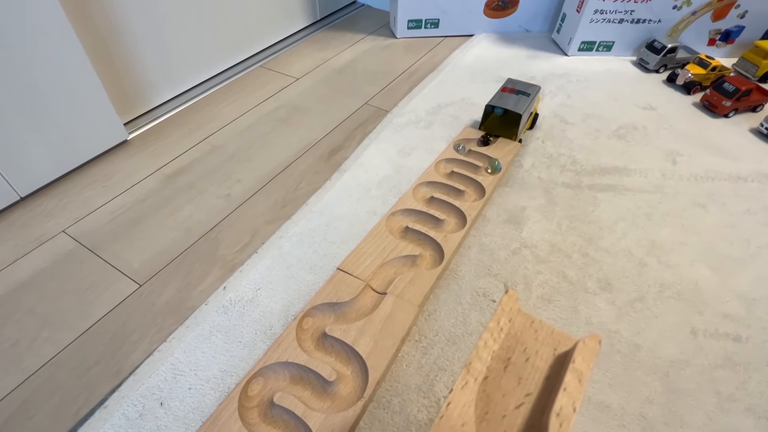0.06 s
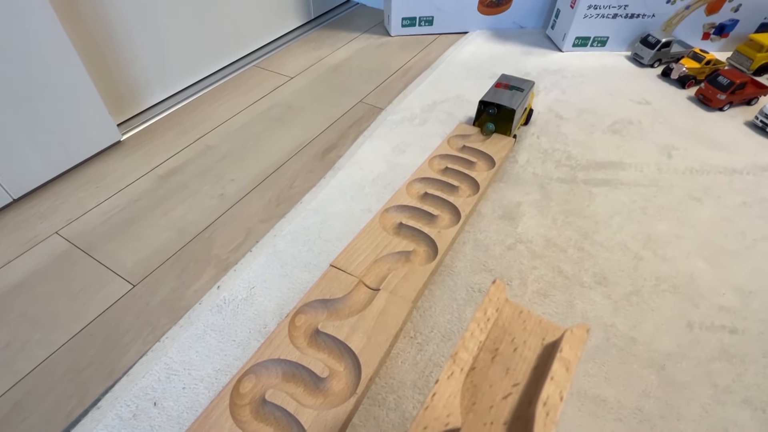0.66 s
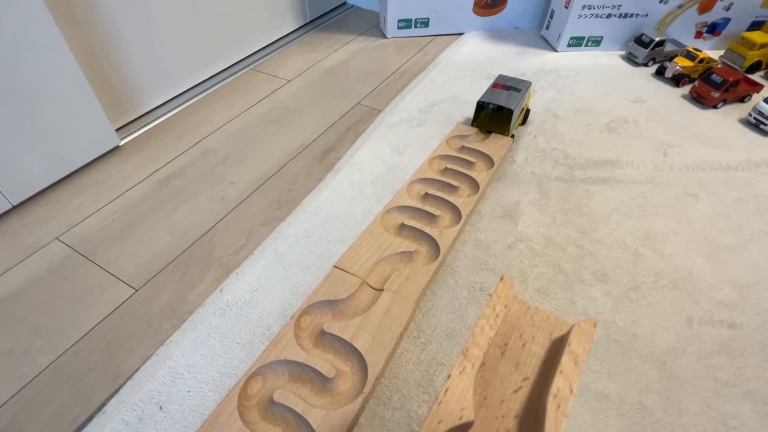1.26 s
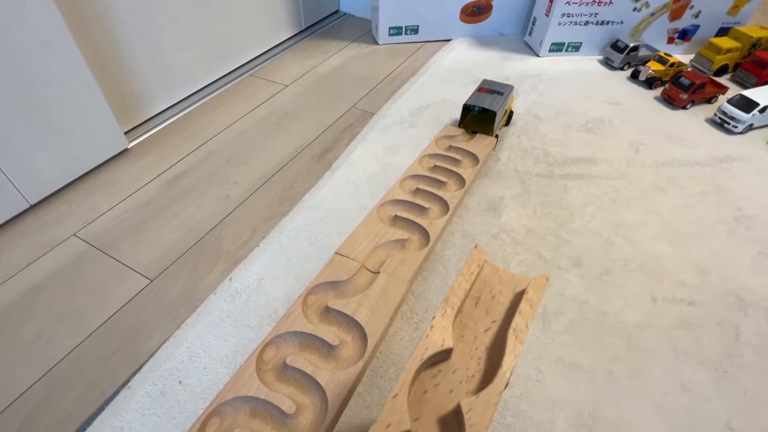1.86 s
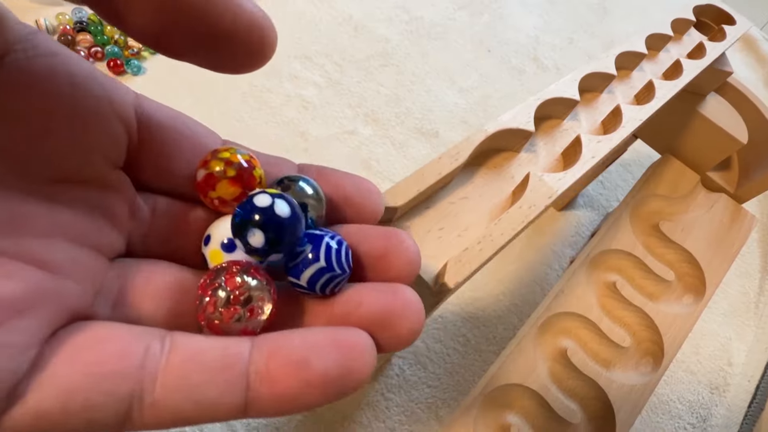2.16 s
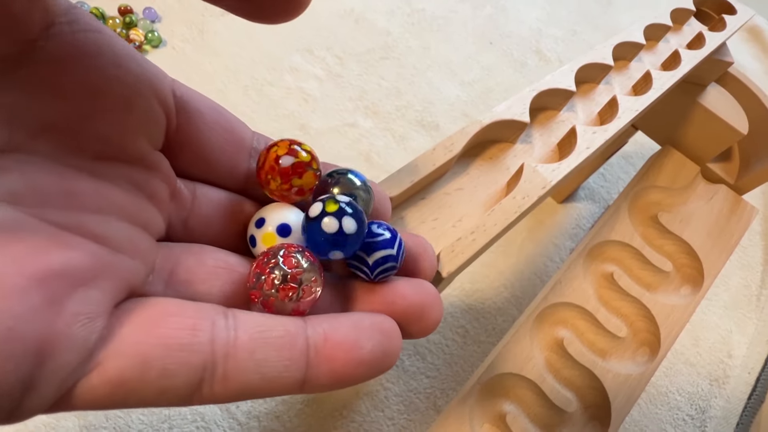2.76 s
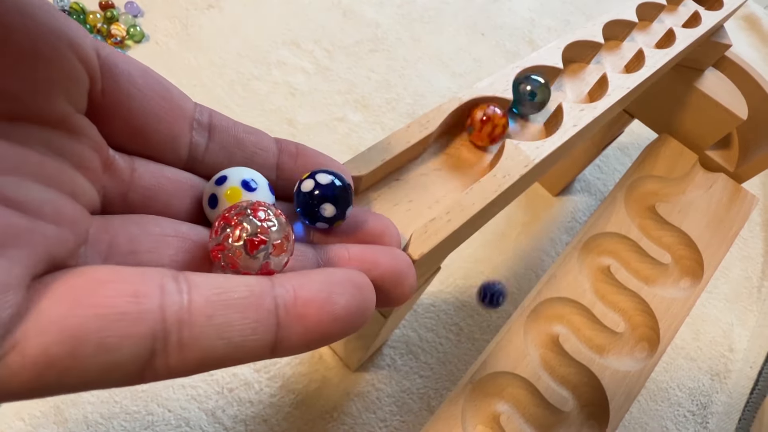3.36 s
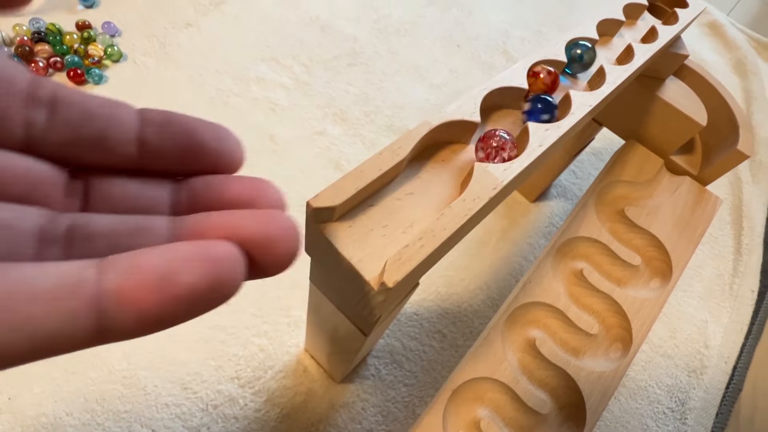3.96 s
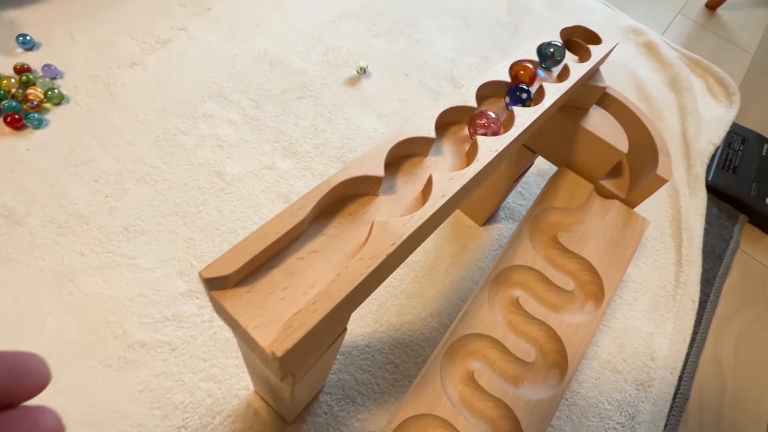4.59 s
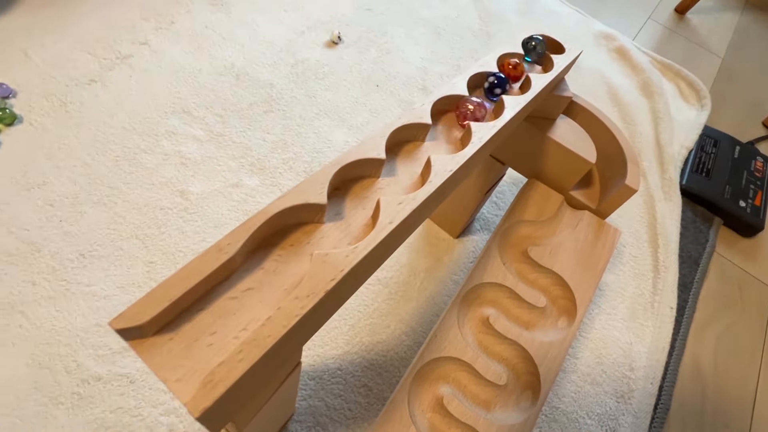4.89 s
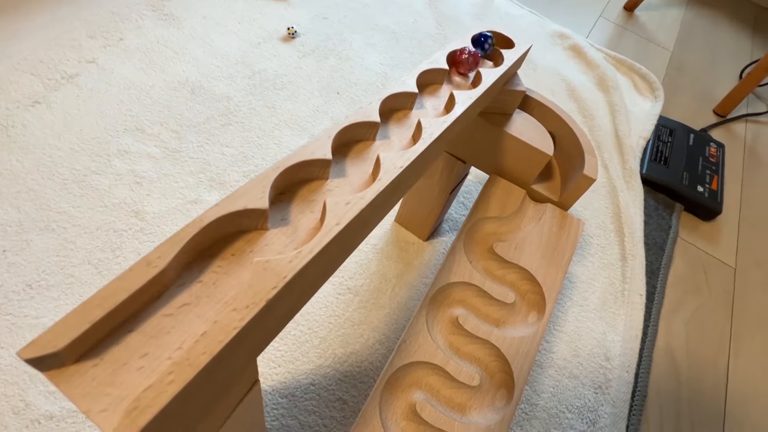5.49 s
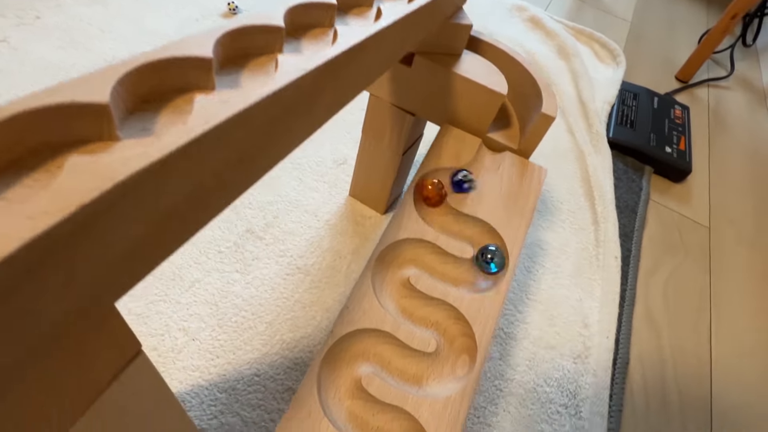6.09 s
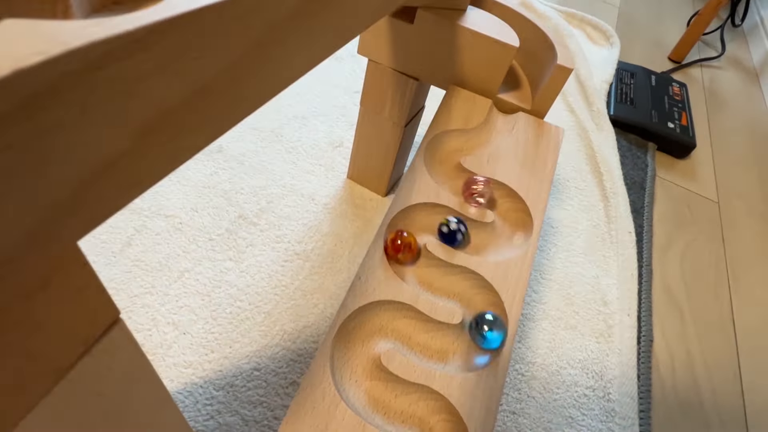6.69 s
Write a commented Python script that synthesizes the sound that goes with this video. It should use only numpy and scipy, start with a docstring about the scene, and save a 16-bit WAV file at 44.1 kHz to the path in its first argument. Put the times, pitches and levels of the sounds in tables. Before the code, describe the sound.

A marble rolls down grooved wood, then several more click, tumble onto a wooden run, and roll, bounce and clash in a quiet room.

```python
"""A living room, with glass marbles on a wooden marble run that stands on a rug.
One marble rattles down a far grooved board into a toy car. A handful clicks in a palm and is tipped into
a tray; two miss and thud on the rug, the rest knock along a scalloped ramp, drop through a bend and roll
down a winding groove. Impacts excite the damped modes of each piece, rolling drives them with a train of
tiny scuffs, and the room adds a diffuse field over quiet air, mains hum and floor rumble."""
import sys
import numpy as np
from scipy import signal
from scipy.fft import rfft, irfft, next_fast_len
from scipy.io import wavfile

SR = 44100
rng = np.random.default_rng(int(sys.argv[2]) if len(sys.argv) > 2 else 0)


def bounce(signal):
    """Save signal as a 16-bit WAV file at the path given by the first command-line argument."""
    frames = np.transpose(np.atleast_2d(signal))
    limited = np.clip(frames, -1, 1)
    pcm = np.round(limited * 32767).astype(np.int16)
    wavfile.write(sys.argv[1], SR, pcm)


N = 297234
KNOCK_SIZE = 4096
TIME = np.arange(N) / SR
KNOCK_TIME = TIME[:KNOCK_SIZE]
KNOCK_HZ = np.fft.rfftfreq(KNOCK_SIZE, 1 / SR) + 1
TILT_FROM_HZ, THICK_TILT_FROM_HZ = 520, 1450  # hardness tilts the spectrum above this; thin, thick pieces


def from_db(db):
    return 10 ** (np.asarray(db) / 20)

def unit_rms(x):
    return x / np.sqrt(np.mean(x ** 2) + 1e-20)

def unit_energy(x):
    return x / np.sqrt(np.mean(np.sum(x ** 2, axis=-1)) + 1e-20)

def decay(t, t60):
    return np.exp(-np.log(1000) * t / t60)

def at_hz(points, hz):
    frequencies, values = np.array(points).T
    return np.interp(np.log(hz), np.log(frequencies), values)

def band_noise(edges_hz, shape):
    band = signal.butter(2, edges_hz, "band", fs=SR, output="sos")
    return signal.sosfilt(band, rng.standard_normal(shape))

def add(track, s, sound):
    """Superposition: a short sound joins the track at time s."""
    start = max(round(s * SR), 0)
    track[:, start:start + sound.shape[-1]] += sound[..., :N - start]

def panned(x, db):
    """Level difference, left minus right, sets the direction."""
    return x * from_db(db * np.array([[.5], [-.5]]))

def coloured(x, points):
    """Zero-phase filtering by a curve of f/Hz, gain/dB."""
    size = next_fast_len(N + KNOCK_SIZE)
    gain = from_db(at_hz(points, np.fft.rfftfreq(size, 1 / SR) + 1))
    return irfft(rfft(x, size) * gain, size)[..., :N]


# grid of every broad body response: f/Hz
BODY_HZ = [450, 1000, 2500, 6000, 8300, 10500, 16000]

def modal_response(body, modes, hardness, top_db, tilt_from_hz, min_width_hz=55, bass_cut_hz=320):
    """Modal superposition: each point of contact feeds and loads the resonances differently."""
    power = from_db(at_hz(list(zip(BODY_HZ, body)), KNOCK_HZ)) ** 2
    skirt = 1 + (KNOCK_HZ / 9000) ** 12
    for hz, width, db in modes:
        detuning = 2 * (KNOCK_HZ - hz * rng.normal(1, .008)) / max(width, min_width_hz)
        power += from_db(rng.normal(db, 2.5)) ** 2 / (1 + detuning ** 2) / skirt
    power /= 1 + (bass_cut_hz / KNOCK_HZ) ** 5  # small blocks radiate little bass
    # a harder, shorter contact tips the spectrum towards the treble
    octaves = np.log2(np.clip(KNOCK_HZ, tilt_from_hz, 12000) / 3000)
    shelf_db = np.interp(KNOCK_HZ, [9000, 12500], [0, top_db])
    magnitude = np.sqrt(power) * from_db(hardness * octaves + shelf_db)
    cepstrum = irfft(np.log(magnitude))  # folded below for a causal, minimum-phase response
    return np.exp(2 * rfft(cepstrum[:KNOCK_SIZE // 2], KNOCK_SIZE) - cepstrum[0])

def knocks(rows, body, modes, scatter_t60, lag_ms, apart_db, top_dropout=.27, tilt_from_hz=TILT_FROM_HZ):
    """Impact excitation: each knock scatters through the piece, partly along paths common to all."""
    out = np.zeros((2, N))
    burst = (1 - np.exp(-KNOCK_TIME / .0003)) * decay(KNOCK_TIME, scatter_t60)
    lag_samples = np.array([[0], [round(lag_ms * SR / 1000)]])
    delay = np.exp(-2j * np.pi * KNOCK_HZ * lag_samples / SR)
    common_paths = from_db(-8) * rng.standard_normal((3, KNOCK_SIZE))
    loudest_db = max(row[1] for row in rows)
    for s, db, hardness, *spot_hz in rows:
        paths = common_paths + rng.standard_normal((3, KNOCK_SIZE))
        both_sides, *each_side = rfft(unit_energy(paths * burst))
        excitation = both_sides * delay + from_db(apart_db) * np.array(each_side)
        # the highest treble drops out on quiet and dull knocks, as in compressed audio
        top_db = top_dropout * (db - loudest_db + 3.4 * min(hardness - 2, 0)) + rng.uniform(-4, 4)
        spot_modes = [(hz, 99, 1) for hz in spot_hz]
        response = modal_response(body, modes + spot_modes, hardness, top_db, tilt_from_hz)
        knock = unit_energy(irfft(excitation * response))
        add(out, s, from_db(db) * np.sqrt(.012 * SR) * knock)  # level: the energy spread over 12 ms
    return out

def bounces(s, db, flight_s, restitution, loss_db, hardness=0, duller_db=0, count=2):
    """Restitution scales each flight as the contacts weaken; rows of t/s, level/dB, hardness."""
    rows = []
    for k in range(count):
        rows.append((s, db - loss_db * k, hardness - duller_db * k))
        s += flight_s * restitution ** k
    return rows

def roll_envelope(runs, rise_db_per_s=0, attack_s=.026, release_db_per_s=123):
    """Rolling level follows speed: a steady slope in dB, then exponential decay once checked."""
    level = 0
    for start, end, db in runs:
        swell_db = rise_db_per_s * (np.clip(TIME, start, end) - start)
        release_db = release_db_per_s * np.maximum(TIME - end, 0)
        onset = np.clip(1 + (TIME - start) / attack_s, 0, 1)
        level = np.maximum(level, from_db(db + swell_db - release_db) * onset)
    return level

def rolling(level, body, modes, hardness, bumps_per_s, bump_t60, tilt_from_hz=TILT_FROM_HZ):
    """Roughness excitation: each tiny bump in the grain drives the modes with a brief scuff."""
    bumps = (rng.random(N) < bumps_per_s / SR) * rng.uniform(.2, 1, N)
    pressure = signal.lfilter([1], [1, -decay(1 / SR, bump_t60)], bumps + 1e-18)
    scuffs = pressure * (rng.standard_normal(N) + rng.standard_normal((2, N)))
    ring = irfft(modal_response(body, modes, hardness, top_db=-11.5, tilt_from_hz=tilt_from_hz))
    return unit_rms(signal.oaconvolve(scuffs, ring[None], axes=1)[:, :N]) * level

def coherent_noise(spectrum, side_db):
    """Partial coherence: one noise common to both sides, a weaker one on each alone."""
    noise = rng.standard_normal(N) + from_db(side_db) * rng.standard_normal((2, N))
    return unit_rms(coloured(noise, spectrum))


# room air: f/Hz, relative density/dB
AIR_SPECTRUM = [(22, -27.5), (62, -3), (280, -9.5), (500, -25.5), (950, -34.5), (1350, -22), (2200, -28),
                (4200, -43.5), (8700, -38), (16000, -67.5)]
# partials of a mains appliance: f/Hz, level/dB
HUM_PARTIALS = [(68, -71.5), (271, -71.5), (339, -74.5)]

def air_and_hum():
    """Ambient noise: a line spectrum of hum on the continuous spectrum of the air."""
    hum = sum(from_db(db) * np.sqrt(2) * np.sin(2 * np.pi * (hz * TIME + rng.random()))
              for hz, db in HUM_PARTIALS)
    return from_db(-63.5) * coherent_noise(AIR_SPECTRUM, side_db=-13) + hum


# spells of rumble: start/s, end/s, level/dB
RUMBLE_RUNS = [(0, 1.78, -59.5), (3.1, 8, -59)]
# its spectrum: f/Hz, relative density/dB
RUMBLE_SPECTRUM = [(22, -31.5), (66, 2), (85, -4.5), (200, -17), (1500, -88.5)]

def floor_rumble():
    """Structure-borne sound: low noise in the floor while the runs are in use."""
    return coherent_noise(RUMBLE_SPECTRUM, side_db=-14) * roll_envelope(RUMBLE_RUNS)


# broad response of the board: gain/dB at BODY_HZ
BOARD_BODY = [-24, -5.5, -12, -15.5, -18.5, -24, -22]
# its modes: f/Hz, width/Hz, gain/dB
BOARD_MODES = [(647, 88, -2), (1005, 150, 0.5), (1215, 100, 0), (1583, 37, -4), (2110, 140, -1),
               (2740, 38, -8), (3994, 130, -11)]
# free rolling: start/s, end/s, initial level/dB, hollow note f/Hz
BOARD_RUNS = [(-0.02, 0.061, -45, 1194), (0.084, 0.384, -39.5, 1200), (0.607, 0.862, -41.5, 1100),
              (1.126, 1.234, -37.5, 990)]
# wall impacts: t/s, level/dB, hardness/(dB/octave), struck spot f/Hz
BOARD_KNOCKS = [(0.1921, -20, 1.5, 2610), (0.2814, -18, -0.5, 1030), (0.5493, -24, 1, 3880),
                (0.5964, -26.5, 0, 1140), (0.775, -17.5, 1, 1620), (0.8007, -22, 2, 2730),
                (1.1391, -27, 4, 1390), (1.1657, -34, -4.5, 485), (1.2403, -33.5, 2, 2110)]
# skids in the turns: start/s, end/s, level/dB
BOARD_SKIDS = [(0.674, 0.69, -32.5), (0.748, 0.775, -29.5), (0.957, 0.97, -37.5), (1.374, 1.39, -50)]

def far_board():
    """Forced vibration: one marble drives the board by impact, rolling and sliding friction."""
    out = knocks(BOARD_KNOCKS, BOARD_BODY, BOARD_MODES,
                 scatter_t60=.049, lag_ms=0, apart_db=3.5, top_dropout=.69)
    for *run, hollow_hz in BOARD_RUNS:
        modes = BOARD_MODES + [(hollow_hz, 130, 5)]
        out += rolling(roll_envelope([run], rise_db_per_s=9), BOARD_BODY, modes,
                       hardness=-2.05, bumps_per_s=270, bump_t60=.019)
    return out + rolling(roll_envelope(BOARD_SKIDS), BOARD_BODY, BOARD_MODES,
                         hardness=.17, bumps_per_s=520, bump_t60=.023)


# broad response of glass: gain/dB at BODY_HZ
GLASS_BODY = [-26, -11, -6, 8.5, 4.5, -12.5, -12]
# single contacts, the first a faint handling knock: t/s, level/dB, hardness/(dB/octave)
GLASS_KNOCKS = [(1.936, -54, -11), (3.1771, -35, 14), (3.2105, -33, 10), (3.6999, -26.5, 19.5),
                (3.7413, -28.5, 13), (3.8015, -24.5, -1), (4.1245, -36, 0.5)]

def glass_clicks():
    """Elastic collision: the brief contact of glass radiates a broadband click; a faint, dull handling knock
    comes first."""
    return knocks(GLASS_KNOCKS, GLASS_BODY, [], scatter_t60=.019, lag_ms=.1, apart_db=4, top_dropout=0)


# broad response of marbles cupped in a hand: gain/dB at BODY_HZ
PALM_BODY = [-28, -22.5, -12, -4.5, -1, -12, -9.5]
# touches as they shift: t/s, level/dB
PALM_CLICKS = [(2.058, -59), (2.089, -66.5), (2.305, -64.5), (2.496, -53), (2.712, -57.5), (2.794, -54),
               (2.8562, -53), (3.0403, -32)]

def palm_chatter():
    """Contact chatter: glass rebounds quickly on glass, brighter for a firmer touch."""
    rows, firmest_db = [], max(db for s, db in PALM_CLICKS)
    for s, db in PALM_CLICKS:
        hardness = -1 - .058 * (firmest_db - db)
        rows += bounces(s, db, flight_s=.0066, restitution=.9, loss_db=6, hardness=hardness, count=3)
    return knocks(rows, PALM_BODY, [], scatter_t60=.014, lag_ms=0, apart_db=.5, top_dropout=.22)


# broad response of the tray: gain/dB at BODY_HZ
TRAY_BODY = [-70, -40, -8, -16.5, -16, -56, -63]
# its modes: f/Hz, width/Hz, gain/dB
TRAY_MODES = [(1246, 148, -0.5), (1560, 200, -3.5), (2110, 200, -7), (2820, 210, 0), (4555, 170, -2),
              (3217, 80, 2.5), (5274, 145, -3)]
# landings: t/s, level/dB, hardness/(dB/octave)
TRAY_KNOCKS = [(3.1232, -19.5, -1), (3.188, -26.5, -5), (3.2003, -22.5, -1), (3.2348, -20, -1.5),
               (3.2813, -23.5, 3), (3.3395, -29.5, 3.5), (3.3561, -27.5, -4), (3.362, -23, 12),
               (3.4381, -30, 0), (3.498, -38, -3.5), (3.6629, -22.5, -2.5), (3.7198, -18.5, -1.5),
               (3.754, -19.5, -0.5), (3.8148, -18.5, 7.5), (3.8814, -21.5, 5)]
# free rolling: start/s, end/s, initial level/dB
TRAY_RUNS = [(3.15, 3.4, -44.5), (3.73, 3.8, -30)]

def tray_tumble():
    """Inelastic impact: marbles land in the tray, hop once more weakly, and roll."""
    rows = []
    for s, db, hardness in TRAY_KNOCKS:
        flight_s = .013 * rng.uniform(.93, 1)
        rows += bounces(s, db, flight_s, restitution=1, loss_db=11, hardness=hardness)
    hits = knocks(rows, TRAY_BODY, TRAY_MODES, scatter_t60=.017, lag_ms=.43, apart_db=2.5)
    return hits + rolling(roll_envelope(TRAY_RUNS, rise_db_per_s=12), TRAY_BODY, TRAY_MODES,
                          hardness=-3, bumps_per_s=180, bump_t60=.0048)


# stray marbles: t/s, peak before the rug's damping/dB, first flight/s, restitution
RUG_DROPS = [(3.5101, -17.5, .204, .8), (4.086, -19, .273, .634)]

def rug_thuds(start_hz=740, glide_s=.0027, swell_s=.0062, rug_cut_hz=560):
    """Dispersion: bending waves in the floor bring the highs first; the boards ring on under the rug."""
    out, t = np.zeros((2, N)), TIME[:SR // 2]
    hardest_db = max(row[1] for row in RUG_DROPS)
    ring_envelope = from_db(-20) * (1 - np.exp(-t / swell_s)) * decay(t, .52)
    for drop in RUG_DROPS:
        for s, db, _ in bounces(*drop, loss_db=9.5, count=3):
            pace = 2 ** ((db - hardest_db) / 25.5)  # a softer landing is lower and slower
            age = t * pace
            hz = start_hz * pace / (1 + age / glide_s)
            pulse = age / swell_s * np.exp(.5 - .5 * (age / swell_s) ** 2)
            knock = pulse * np.sin(2 * np.pi * np.cumsum(hz) / SR)
            boards = unit_rms(band_noise((62, 300), len(t))) * ring_envelope
            add(out, s, from_db(db) * (knock + boards))
    return signal.sosfilt(signal.butter(2, rug_cut_hz, fs=SR, output="sos"), out)


# broad response of the ramp: gain/dB at BODY_HZ
RAMP_BODY = [-18.5, -50.5, -26, -16.5, -19, -61, -71]
# its modes: f/Hz, width/Hz, gain/dB
RAMP_MODES = [(1720, 290, 0.5), (2700, 140, -3), (3190, 115, 3.5), (4610, 72, -4)]
# free rolling: start/s, end/s, initial level/dB
RAMP_RUNS = [(3.6, 5.53, -54)]
# swings into the scallops: t/s, level/dB, hardness/(dB/octave), follower's delay/s
RAMP_SWINGS = [(4.0426, -26.5, 3.5, 0.016), (4.1853, -29, 4.5, 0.026), (4.3432, -28, 4, 0.016),
               (4.502, -30, 6, 0.02), (4.6452, -31, 2.5, 0.043), (4.8625, -30.5, 5.5, 0.014),
               (4.9689, -31.5, 5, .0365), (5.057, -32.5, 6.5, 0.013), (5.3236, -30.5, 6.5, 0.045)]
# lone taps: t/s, level/dB
RAMP_TAPS = [(3.9588, -22.5), (4.3783, -33), (4.4061, -35), (4.7047, -39.5), (4.818, -37)]

def scalloped_ramp(tap_hardness=7.5):
    """Paired impacts over rolling noise: a leader strikes each scallop, then a softer follower."""
    rows = []
    for s, db, hardness, delay_s in RAMP_SWINGS:
        rows += [(s, db, hardness), (s + delay_s, db - 1, hardness - 1)]
    rows += [(s, db, tap_hardness) for s, db in RAMP_TAPS]
    hits = knocks(rows, RAMP_BODY, RAMP_MODES, scatter_t60=.019, lag_ms=.1, apart_db=1)
    return hits + rolling(roll_envelope(RAMP_RUNS, rise_db_per_s=5), RAMP_BODY, RAMP_MODES,
                          hardness=-3.55, bumps_per_s=140, bump_t60=.052)


# broad response of the tray above its post: gain/dB at BODY_HZ
POST_BODY = [-41, -23.5, -27, -22, -26, -51, -47]
# modes there: f/Hz, width/Hz, gain/dB
POST_MODES = [(660, 110, -14.5), (1430, 33, -3.5), (2510, 260, -11), (3490, 140, -0.5), (4010, 210, -13.5),
              (6100, 64, -6)]
# one strike: t/s, level/dB, hardness/(dB/octave)
POST_KNOCKS = [(3.6025, -13.5, -2)]

def post_knock():
    """The driving point selects the modes: struck above its post, the tray rings differently."""
    return knocks(POST_KNOCKS, POST_BODY, POST_MODES, scatter_t60=.019, lag_ms=.5, apart_db=1.5)


# broad response of the bend: gain/dB at BODY_HZ
BEND_BODY = [-8, -10.5, -7.5, -12.5, -19.5, -29.5, -38]
# its modes: f/Hz, width/Hz, gain/dB
BEND_MODES = [(1956, 360, 3), (2380, 140, 1.5), (3060, 63, -8), (3630, 89, 1), (5740, 50, -2.5),
              (8120, 130, -8.5)]
# four drops: t/s, level/dB, first flight/s, restitution
BEND_DROPS = [(5.1157, -18.5, 0.082, 0.7), (5.487, -19, 0.071, 0.79), (5.705, -19.5, .074, .89),
              (6.0008, -19, 0.0765, 0.57)]
# taps on the way through: t/s, level/dB, hardness/(dB/octave)
BEND_TAPS = [(5.1852, -31, 5), (5.2165, -39, 10), (5.3535, -39, -2), (5.4702, -30.5, 0), (5.5795, -37, 2.5),
             (5.6532, -31.5, -3), (5.8714, -25, 0.5), (5.8957, -26, -1), (5.9065, -27.5, -0.5)]

def bend_bounces():
    """Collision loss: each marble lands in the thick bend, grazes its wall and bounces ever lower."""
    rows = list(BEND_TAPS)
    for drop in BEND_DROPS:
        s, db = drop[:2]
        rows += bounces(*drop, loss_db=5, hardness=1.5, duller_db=1.5, count=3)
        rows.append((s + .0297, db - 12, -.1))  # the graze, in the first flight
    return knocks(rows, BEND_BODY, BEND_MODES,
                  scatter_t60=.015, lag_ms=.04, apart_db=.5, tilt_from_hz=THICK_TILT_FROM_HZ)


# broad response of the groove: gain/dB at BODY_HZ
GROOVE_BODY = [-9.5, -5, -35, -24.5, -33.5, -42, -52]
# its modes: f/Hz, width/Hz, gain/dB
GROOVE_MODES = [(1745, 99, 0.5), (2150, 380, -3), (2670, 47, -1.5), (3220, 95, -0.5), (3810, 92, -0.5),
                (4074, 54, -8.5), (4936, 92, -7.5), (6000, 120, -10)]
# free rolling: start/s, end/s, initial level/dB
GROOVE_RUNS = [(5.75, 6.28, -44), (6.39, 6.74, -43)]
# clashes of marbles: t/s, level/dB, hardness/(dB/octave), first flight/s
GROOVE_CLASHES = [(6.166, -17.5, 6.5, 0.04), (6.2281, -16.5, 7, 0.045), (6.5087, -29.5, -2, .015),
                  (6.6054, -16.5, 4.5, 0.038)]
# light wall taps, and two early nudges of the piece long before the rolling: t/s, level/dB,
# hardness/(dB/octave)
GROOVE_TAPS = [(0.08, -39.5, -5.5), (0.4605, -38, -4), (6.1295, -29, 0.5), (6.1812, -29, 6.5),
               (6.456, -37, -6), (6.719, -33, -27)]

def winding_groove(restitution=.715):
    """Damped rattling: rolling marbles clash, then rebound ever duller from wall to wall."""
    rows = []
    for s, db, hardness, flight_s in GROOVE_CLASHES:
        rows.append((s, db, hardness))
        rows += bounces(s + flight_s, db - 10, flight_s * restitution, restitution,
                        loss_db=4.5, hardness=-1.5, duller_db=2.2, count=4)
    hits = knocks(rows + GROOVE_TAPS, GROOVE_BODY, GROOVE_MODES,
                  scatter_t60=.019, lag_ms=.1, apart_db=2.5, tilt_from_hz=THICK_TILT_FROM_HZ)
    return hits + rolling(roll_envelope(GROOVE_RUNS, rise_db_per_s=-3), GROOVE_BODY, GROOVE_MODES,
                          hardness=-6.5, bumps_per_s=240, bump_t60=.0079, tilt_from_hz=THICK_TILT_FROM_HZ)


# reverberation time: f/Hz, T60/s
ROOM_T60 = [(120, 0.055), (800, 0.28), (2500, 0.25), (6000, 0.37), (14000, 0.073)]

def room(x, first_s=.0027, build_s=.0013, coherent_below_hz=800):
    """Diffuse field: each band decays at its own rate, and the two sides are coherent in the bass."""
    t = TIME[:SR * 2 // 3]
    edges, tail = np.geomspace(50, 17000, 12), 0
    for low, high in zip(edges, edges[1:]):
        hz = np.sqrt(low * high)
        mid, side = band_noise([low, high], (2, len(t)))
        coherence = 1 / (1 + (hz / coherent_below_hz) ** 2)
        band = np.sqrt(1 + coherence) * mid + np.sqrt(1 - coherence) * side * [[1], [-1]]
        tail = tail + band * decay(t, at_hz(ROOM_T60, hz))
    tail *= 1 - np.exp(-np.maximum(t - first_s, 0) / build_s)
    return signal.oaconvolve(x, unit_energy(tail), axes=1)[:, :N]

def scene():
    """Direct and reverberant sound add; the far board has the largest reverberant share."""
    ambience = air_and_hum() + floor_rumble()
    board = far_board()
    glass = glass_clicks() + panned(palm_chatter(), 6)  # the hand is to the left
    tray = tray_tumble() + post_knock()
    rug = rug_thuds()
    ramp = scalloped_ramp()
    bend = bend_bounces()
    groove = winding_groove()
    echoes = room(from_db(-9.5) * tray + from_db(-10) * (ramp + glass) + from_db(-10.5) * rug)
    echoes += room(from_db(-7.5) * (bend + groove))
    echoes = coloured(echoes, [(8500, -.5), (11000, -23)])  # the highest treble is cut
    far = board + room(from_db(-3.5) * board)
    near = glass + panned(tray, -2.5) + rug + ramp + panned(bend, -3) + groove
    return ambience + far + near + echoes


# microphone balance: f/Hz, left minus right level/dB
BALANCE_DB = [(100, 3.5), (500, 7.5), (1200, 3.15), (2500, 0.5), (5000, 4), (12000, 1)]
# treble colour of the microphone ports: f/Hz, gain/dB
PORT_COLOUR = [(10400, -1), (11600, 7.5), (13000, -1.5), (16000, -6)]

def record(dry, port_hz=8660, port_width_hz=380, port_db=12, cutoff_hz=16100):
    """Transducer response: more bass on the left, a port resonance on the right, and a steep top cut."""
    left = coloured(dry[0], [(hz, db / 2) for hz, db in BALANCE_DB])
    right = coloured(dry[1], [(hz, -db / 2) for hz, db in BALANCE_DB])
    resonance = signal.iirpeak(port_hz, port_hz / port_width_hz, fs=SR)
    right += from_db(port_db) * signal.lfilter(*resonance, right)
    ports = coloured(np.array([left, right]), PORT_COLOUR)
    return signal.sosfilt(signal.ellip(10, .5, 70, cutoff_hz, fs=SR, output="sos"), ports)


dry = scene()
out = record(dry)
bounce(out)
```